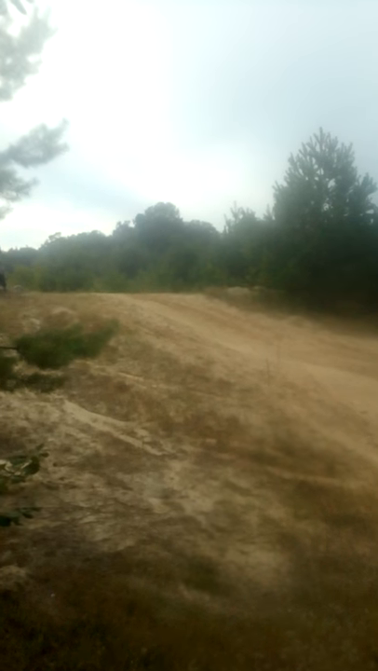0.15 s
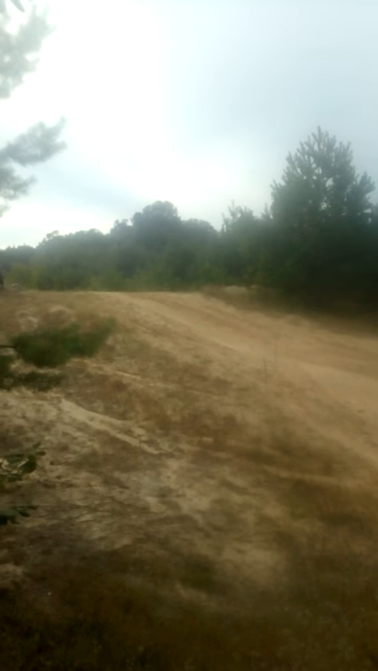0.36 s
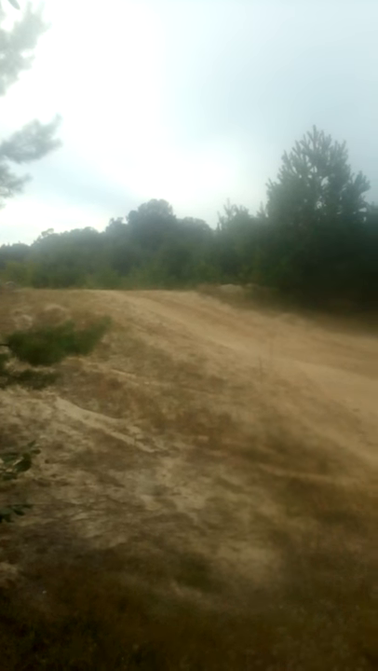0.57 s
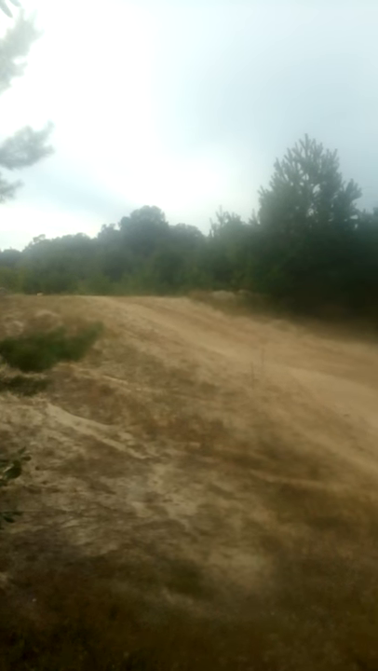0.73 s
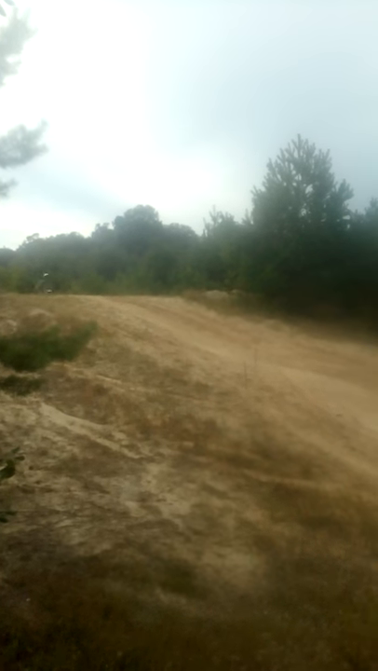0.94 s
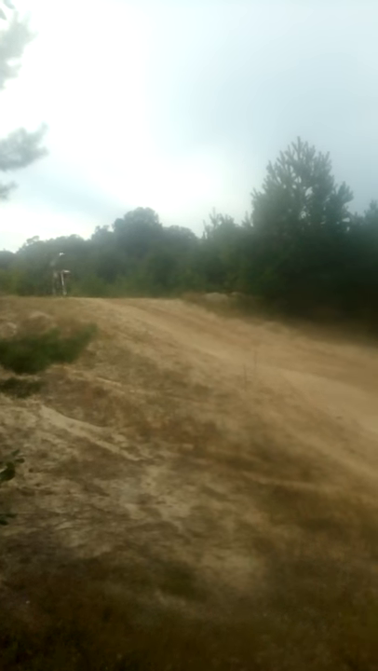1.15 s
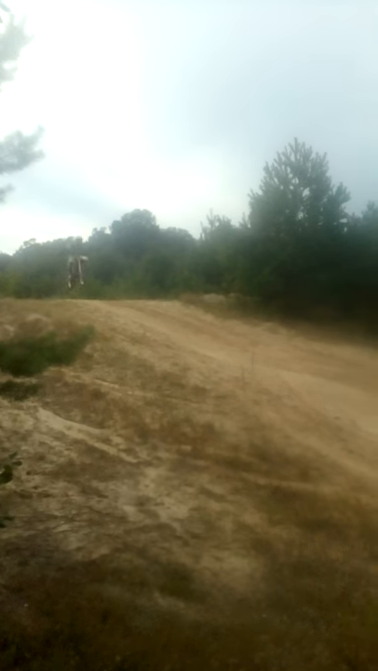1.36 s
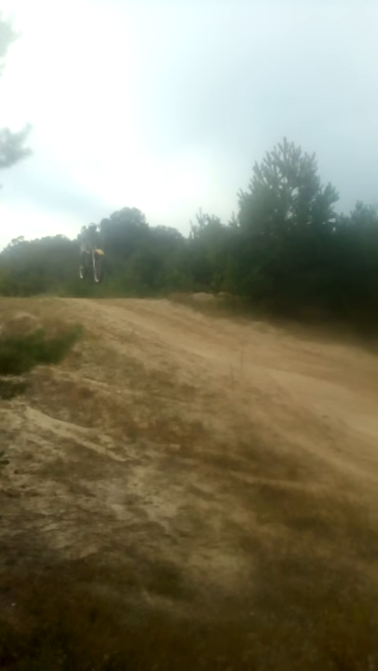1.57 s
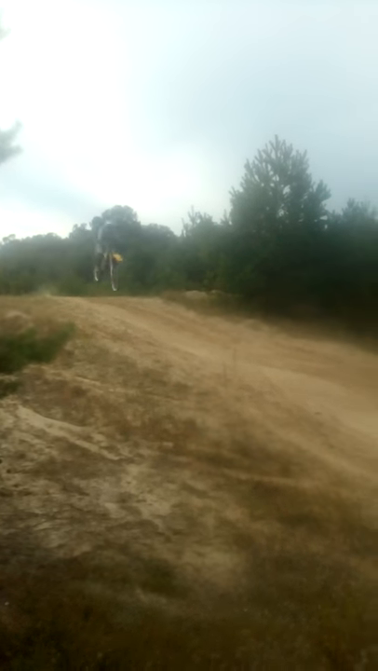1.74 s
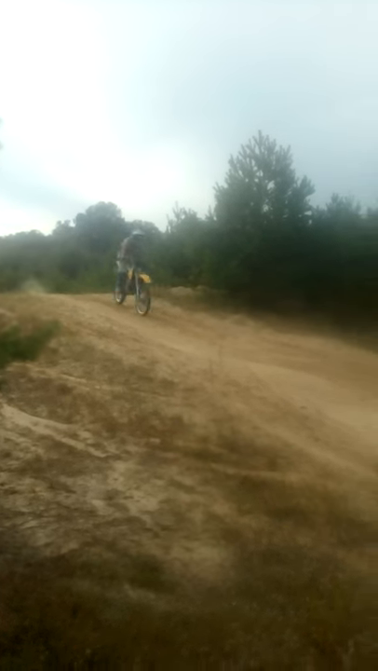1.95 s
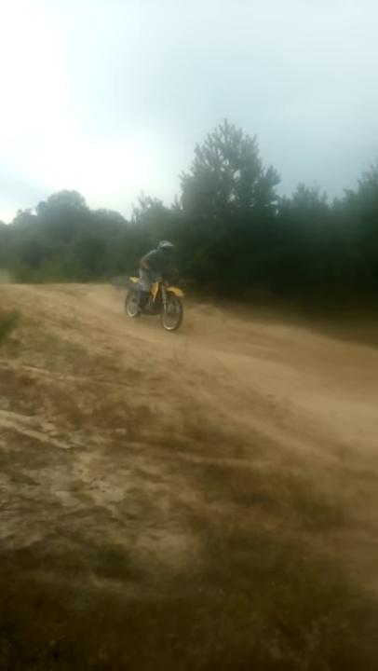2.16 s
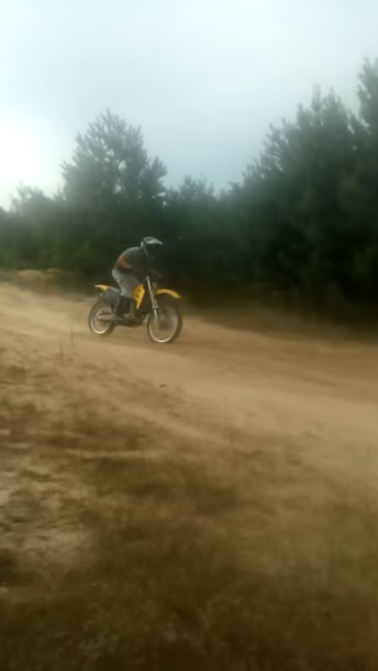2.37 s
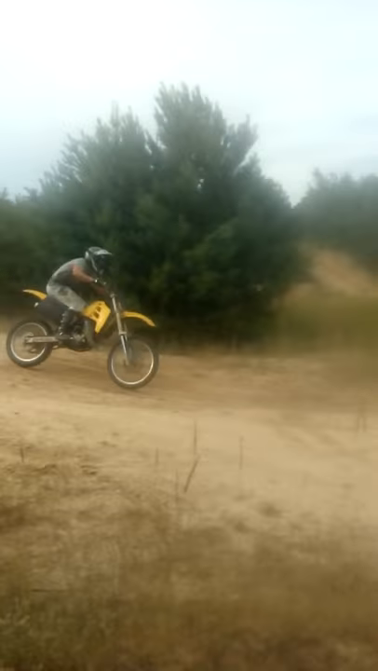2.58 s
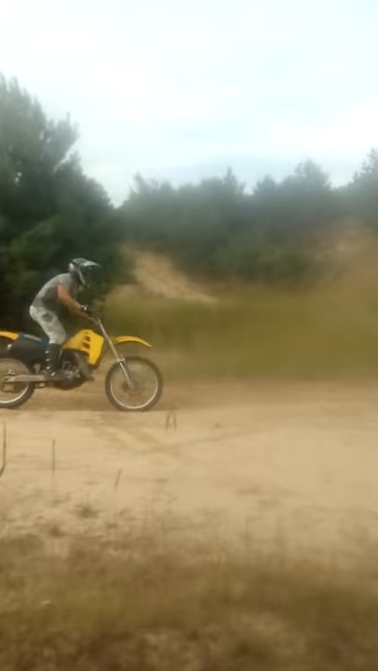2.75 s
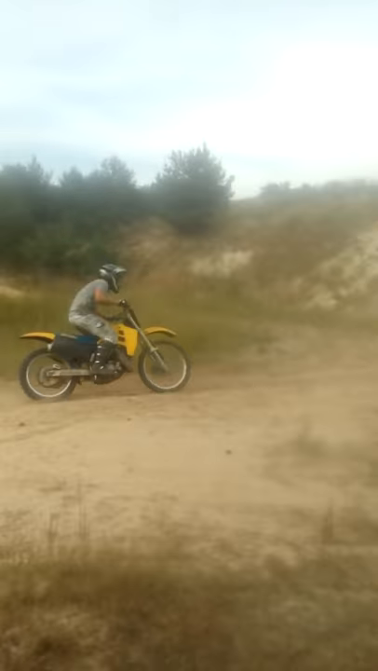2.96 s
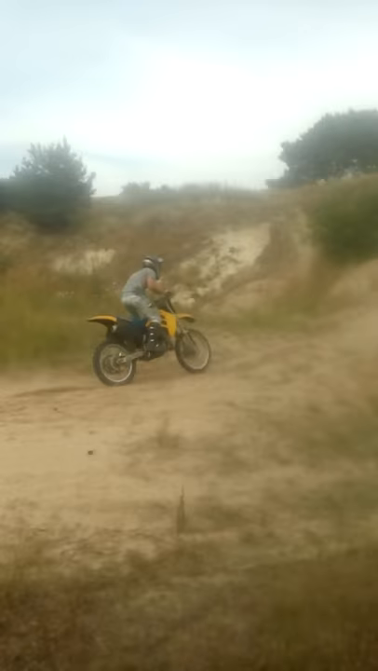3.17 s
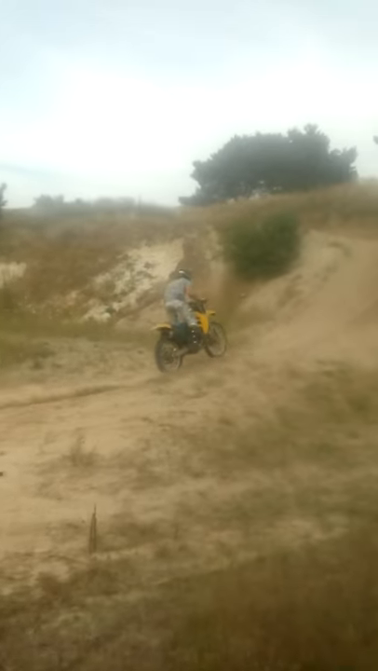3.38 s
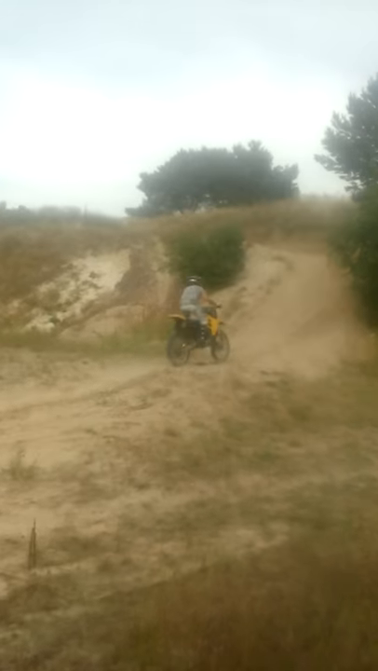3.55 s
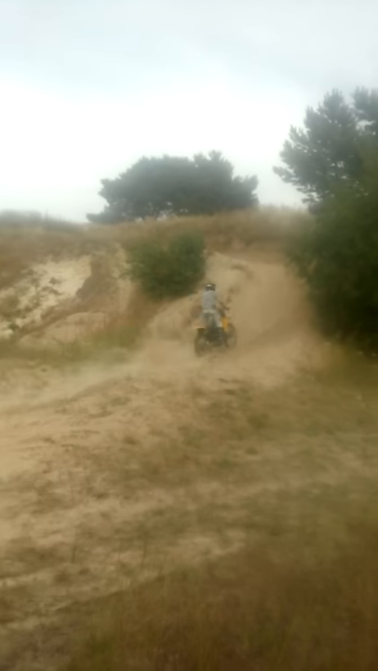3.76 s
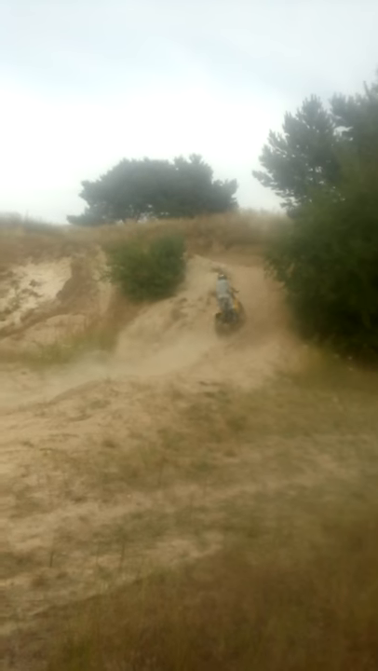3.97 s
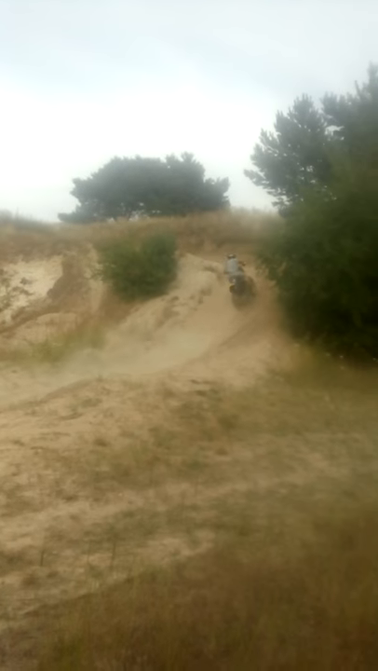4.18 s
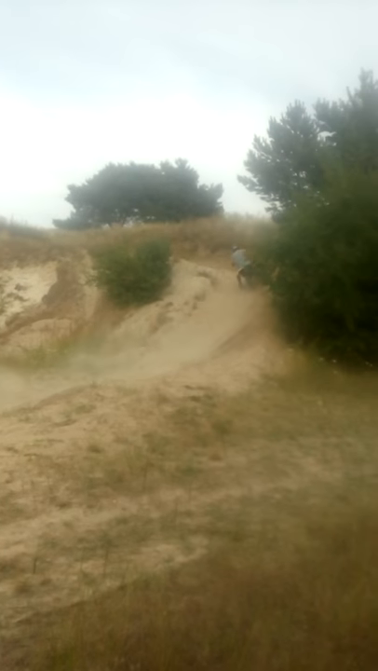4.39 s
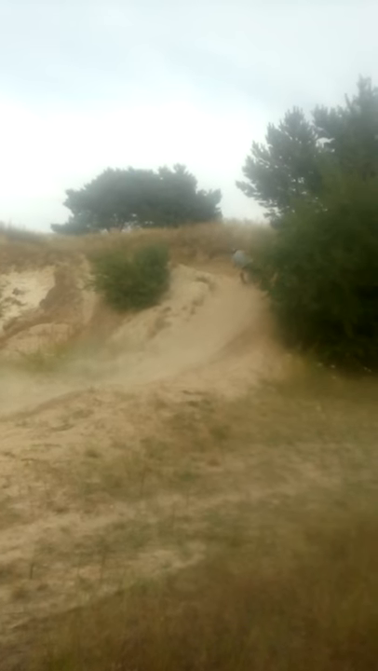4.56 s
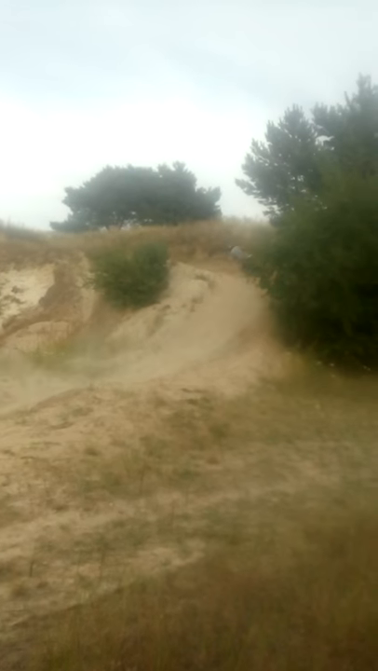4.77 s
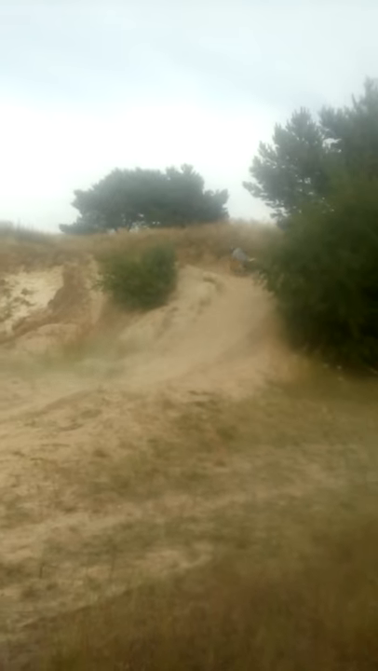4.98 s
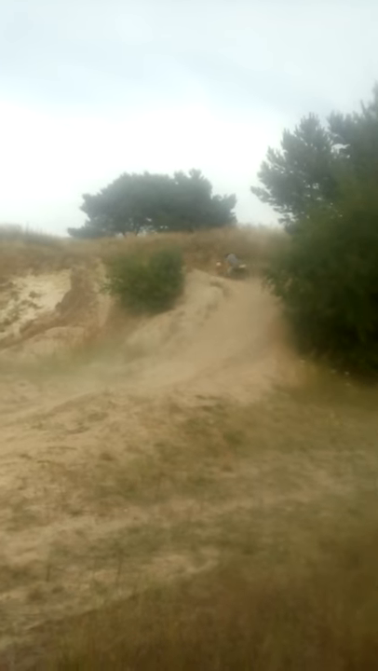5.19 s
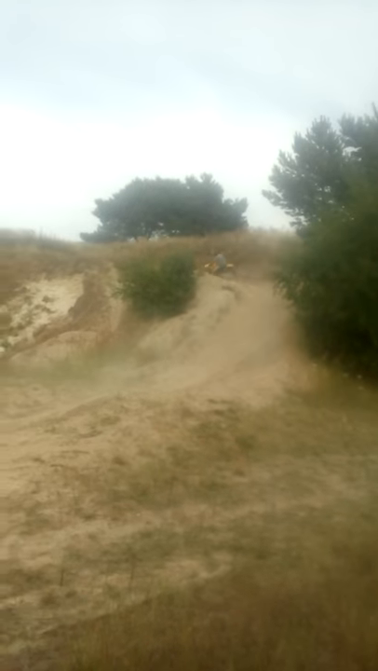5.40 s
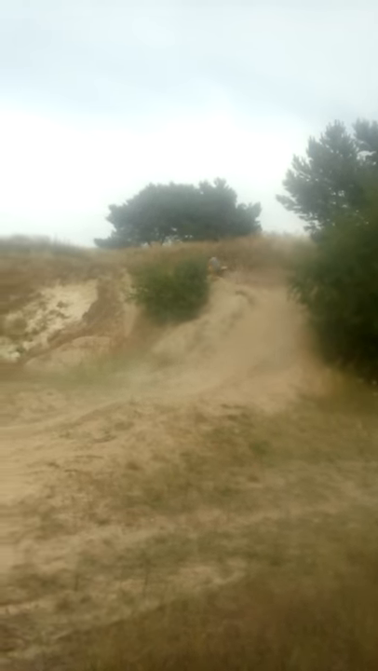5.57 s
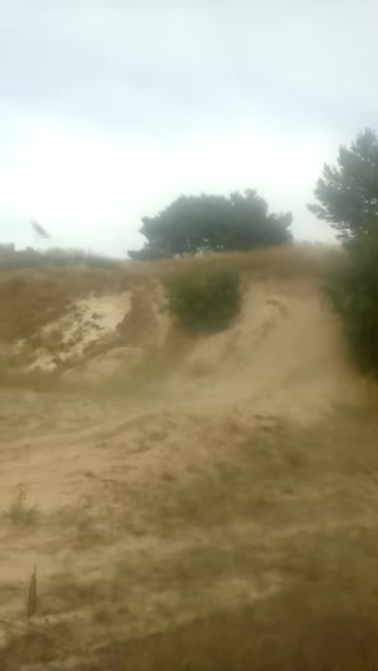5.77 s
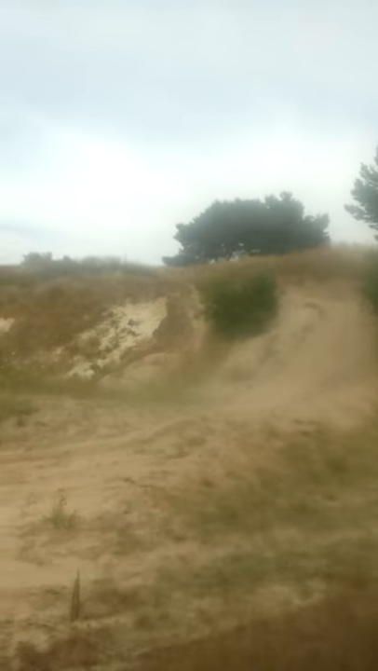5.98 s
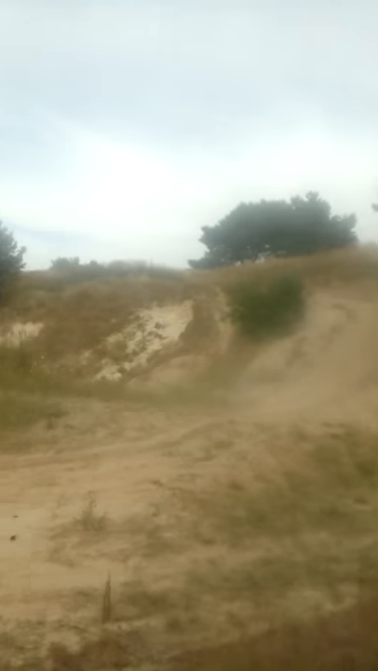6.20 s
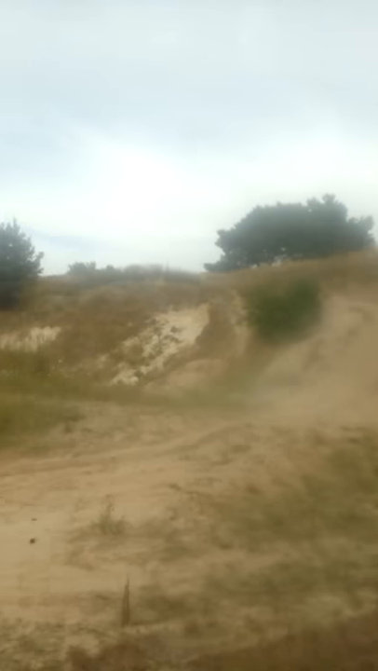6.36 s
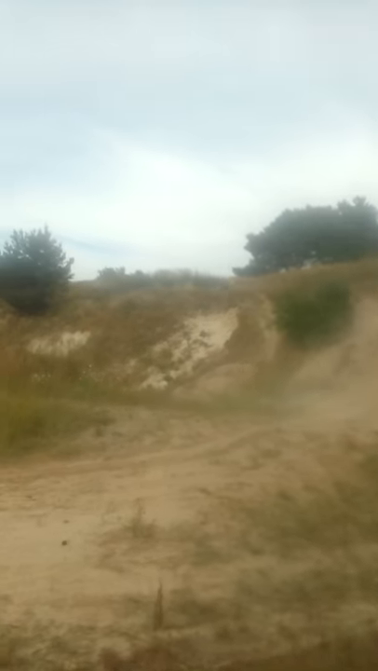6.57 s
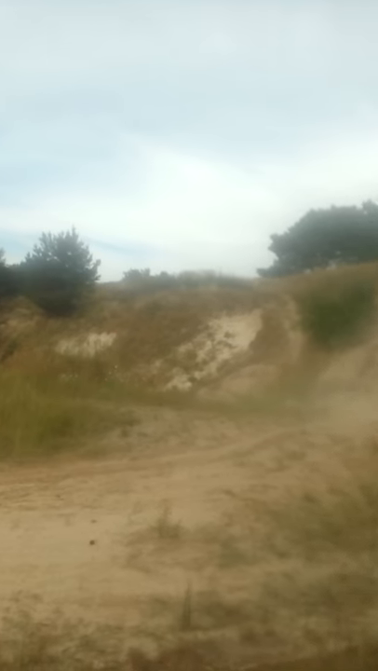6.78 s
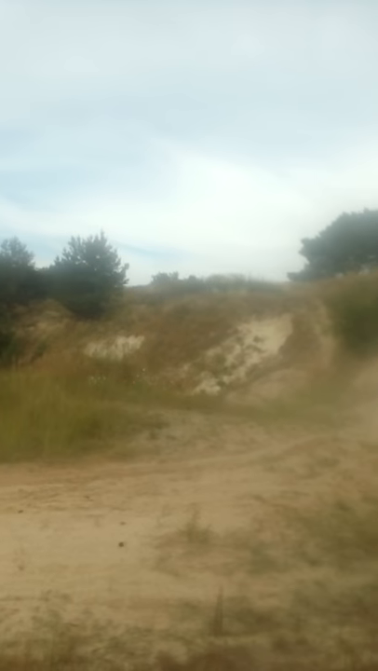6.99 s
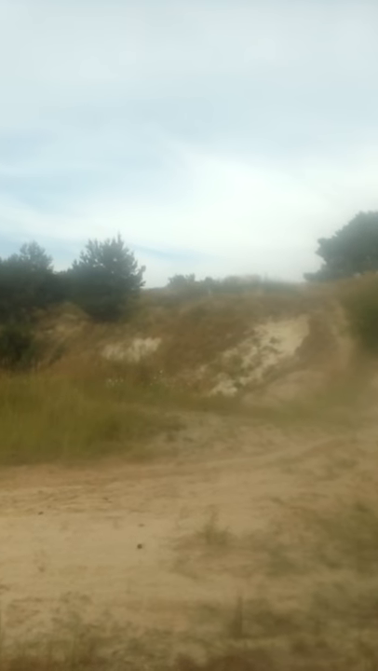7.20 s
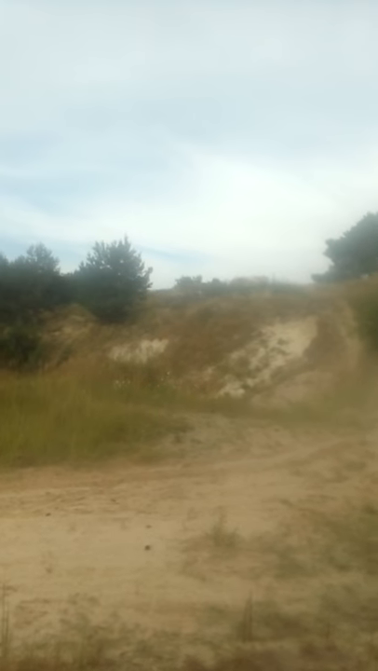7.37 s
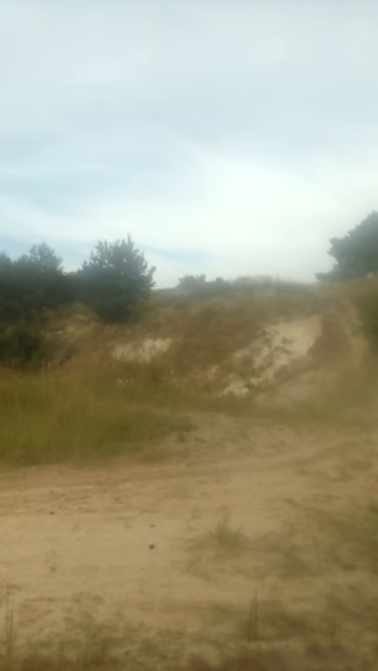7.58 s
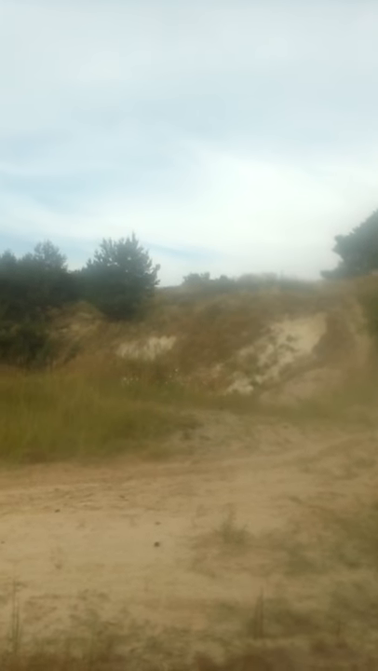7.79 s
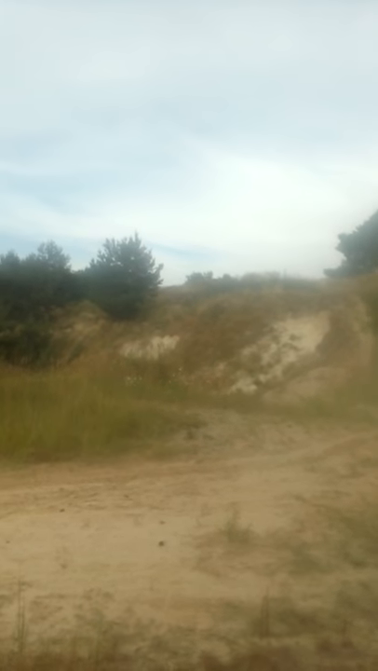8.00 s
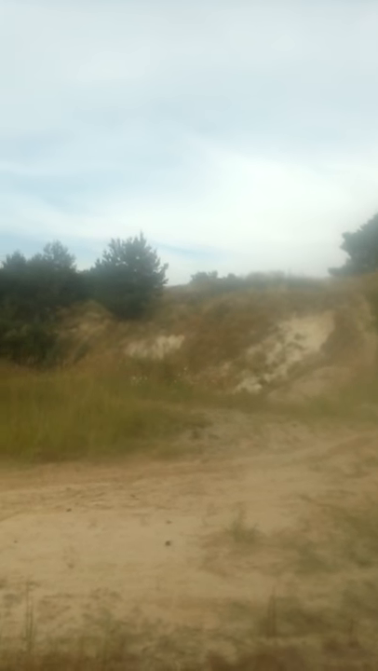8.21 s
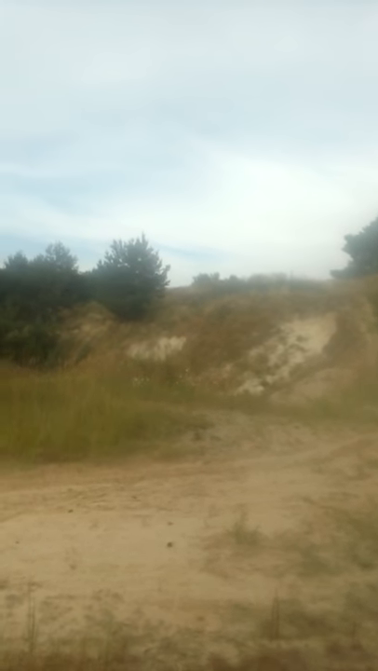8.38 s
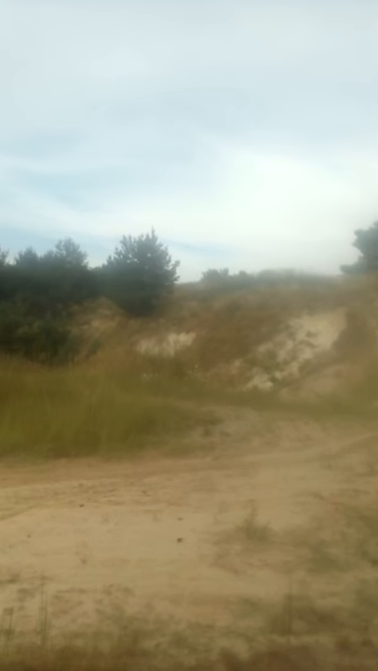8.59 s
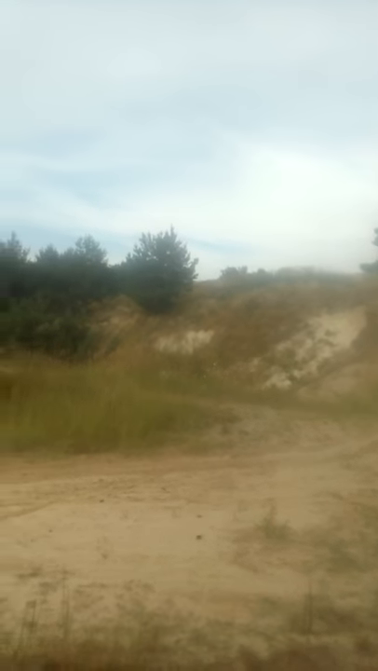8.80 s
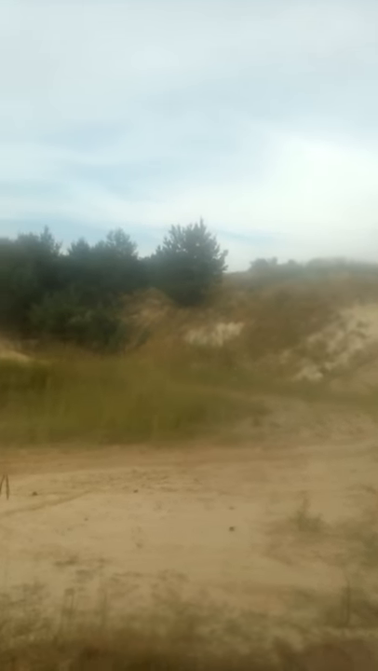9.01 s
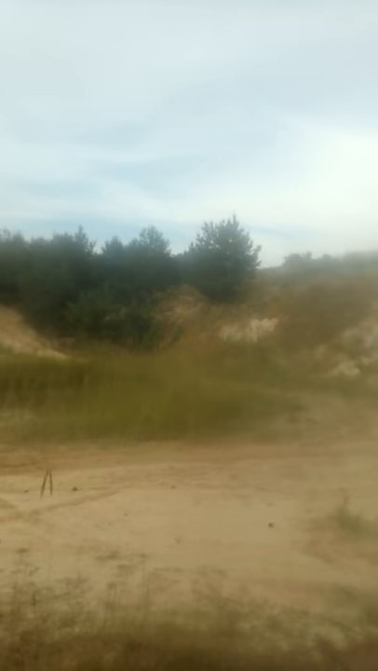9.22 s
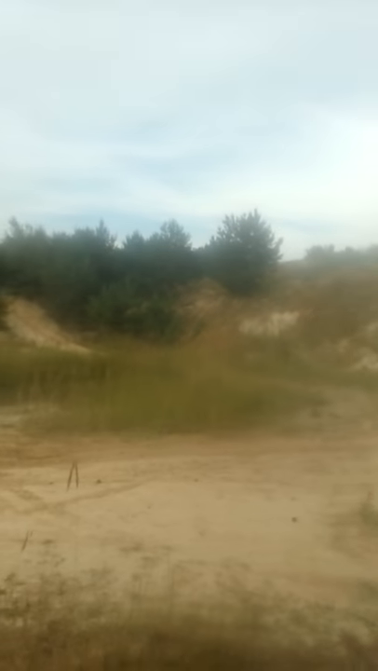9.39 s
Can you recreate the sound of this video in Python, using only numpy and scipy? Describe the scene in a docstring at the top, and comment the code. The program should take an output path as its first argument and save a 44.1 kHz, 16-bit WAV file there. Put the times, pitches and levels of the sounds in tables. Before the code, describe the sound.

Outdoors on open sand, a small two-stroke dirt bike starts distant and muffled, then bursts closer with a hissing, metallic rasp. It passes loudest around three seconds, slightly distorting the microphone, then crackles and revs in bursts up a dune. The engine cuts low behind the crest, with two dull knocks, leaving faint slow puttering, quiet air and small distant blips at the end.

```python
"""Small dirt bike in the sand

A two-stroke bike comes over a sandy rise, passes close, climbs a dune and drops behind it.
It fires once a turn: steady overtones of the firing rate make a boom, a bark and a honk, and each
blast of noise rasps in the silencer and hisses. The throttle snaps open and shut, cracks and dull
knocks are struck resonances, quiet air lies under it all, and the loudest peaks overload the microphone.
"""
import sys
import numpy as np
from scipy import signal
from scipy.fft import rfft, irfft, next_fast_len
from scipy.io import wavfile

SR = 44100
rng = np.random.default_rng(int(sys.argv[2]) if len(sys.argv) > 2 else 0)


def wrap_up_sound(samples):
    """Save the sound to the file named by the first command line argument, as 16-bit audio."""
    columns = np.atleast_2d(samples).T
    # keep every value between -1 and 1, then stretch to whole-number steps
    tamed = np.clip(columns, -1, 1)
    steps = np.round(tamed * 32767).astype(np.int16)
    wavfile.write(sys.argv[1], SR, steps)


N = 416744   # length in samples

# How fast the engine fires, before ruts and wheel slip: t/s, f/Hz
FIRING_RATE = [(0.369, 122.7), (0.49, 164), (0.6, 154), (0.655, 125), (0.71, 108), (0.765, 137),
               (0.84, 126), (1.307, 128.9), (1.377, 147.2), (2.15, 112.5), (2.41, 127), (2.499, 155),
               (2.67, 151), (2.835, 173), (2.913, 140.9), (3.133, 132.3), (3.283, 160.9), (3.457, 153.9),
               (3.577, 135.6), (3.677, 153.9), (3.786, 149.2), (3.826, 128.3), (3.996, 112.3),
               (4.081, 131.8), (4.156, 119.9), (4.245, 126.6), (4.49, 93), (4.844, 148), (5.09, 150),
               (5.28, 131), (5.4, 102), (5.58, 99.5), (5.887, 142.2), (6.161, 127.7), (6.196, 117.9),
               (6.42, 122.4), (6.53, 149), (6.77, 146), (6.79, 104), (7.009, 96.2), (7.493, 95.9),
               (7.802, 81.7), (8.072, 88.1), (8.321, 84.1), (8.47, 90.5), (8.6, 86), (8.64, 75.0),
               (8.98, 72.0), (9.05, 84.0), (9.119, 104.0), (9.354, 77.8), (9.454, 88.8)]
# Ripples in the climb tug at the speed, and the wheel slips and grips in the sand (depths are fractions)
RUTS_S, RUTS_LENGTH_S, RUTS_PER_S, RUTS_DEPTH = 5.08, .6, 8.6, .03
SLIP_DEPTH, SLIP_PER_S = .01, 9

# Throttle eased off, as the bike nears, passes and drops away: t/s, exhaust note level/dB, rasp level/dB
COASTING = [(0, -32, -53.5), (0.63, -39, -59), (1.4, -30, -33), (2.06, -33, -28), (2.29, -30, -26),
            (3.0, -8.5, -16.5), (3.88, -16, -27.5), (4.32, -37.5, -31), (4.46, -32.5, -33),
            (5.45, -18.5, -32.5), (5.74, -22, -29.5), (6.2, -23, -38.5), (6.46, -29, -40.5),
            (6.78, -39.5, -44), (6.9, -55, -57.5), (7.8, -47.5, -52), (9.45, -54, -64.5)]
# Throttle held open: opens t/s, shuts t/s, extra wait of the rasp/s,
# note level/dB, rasp level/dB, note swell by the end/dB, rasp swell by the end/dB
THROTTLE = [(-0.02, 0.5, 0.022, -31, -50.5, 6.5, 6), (0.495, 0.658, .0, -36, -44.5, -0.5, -4),
            (0.636, 1.103, 0.1, -30, -42, -0.5, -6.5), (1.087, 1.352, .0, -27.5, -48.5, 7.5, 19),
            (2.104, 2.235, 0.069, -18.5, -18.5, -7.5, -2), (2.361, 2.884, 0.063, -12, -14, 4, 1.5),
            (3.041, 3.778, 0.021, -6, -12, -3, -6), (3.947, 4.252, 0.057, -8.5, -21, -5, 4),
            (4.253, 4.286, 0, -22, -24.5, 10, 4), (4.47, 5.334, 0.066, -11, -20, -4.5, -2.5),
            (5.766, 6.136, .0, -19.5, -27, 1, -5.5), (6.467, 6.707, 0.00088, -15.5, -35, -5, -2),
            (8.997, 9.193, 0.04, -31, -39.5, -15.5, -6), (9.345, 9.497, 0.038, -40.5, -41, 13, -9)]
NOTE_RISE_S, NOTE_RELEASE_S = 0.043, 0.021
RASP_RISE_S, RASP_RELEASE_S = 0.015, 0.027

# Exhaust tones as the pipe turns: t/s, firing tone level at BOOM_HZ/dB,
# octave level against what is left/dB, level of the overtones near 1 kHz/dB
TONE_BALANCE = [(0, -7.5, -0.5, -9.5), (1.0, -8.5, -1.5, 0.5), (1.75, -9, -0.5, -5), (2.3, -6.5, -2, -7.5),
                (2.85, -11, -0.5, -10), (3.2, -12.5, -1.5, -11.5), (4.3, -6, -1.5, 0), (5.0, -3, 2, -0.5),
                (5.55, -9, -1.5, -1.5), (5.9, -3, -1, 1.5), (6.72, -4.5, -2.5, -3), (6.9, -3.5, -7, 6),
                (8.9, -6, -5, -0.5), (9.05, -3.5, -5, -1.5)]
BOOM_HZ, BOOM_DB_PER_OCTAVE = 125.1, 18.5   # the firing tone carries better the faster the engine turns
HONK_FOLLOWS_NOTE = 0.15   # share of the honk's level that follows the note; the rest follows the rasp
# How the exhaust pipe favours some pitches: f/Hz, level/dB
PIPE = [(260, 18.5), (420, 8.5), (550, 12.5), (680, -5.5), (900, 8), (1200, 0), (1500, -63)]
# Sixth overtone standing out of the pipe's curve: t/s, extra level/dB
SIXTH_OVERTONE = [(2.6, 1.5), (2.76, 11.5), (2.86, 1.5), (8.55, 7), (8.7, 10)]

# Snap of the opening port, sharpest with the pipe towards the listener, and unevenness of the note:
# t/s, snap level over the turbulence/dB (9 dB lower in the freer gas), roughness/0-1
PORT_SNAP = [(3.7, 29, .12), (4.1, 32, .3), (5.3, 30, .1), (6.7, 28, .1), (6.9, 22, .25), (8.95, 22, .3),
             (9.05, 31, .8)]
# Silencer resonances, before their slow swelling: f/Hz, width/Hz, level/dB
SILENCER = [(1963, 370, 5.5), (2356, 215, 3), (2716, 173, -2.5)]
# Thin ring of the silencer shell, gliding as the bike passes and turns away: t/s, f/Hz
SHELL_RING = [(3.05, 2163), (3.25, 2060), (3.5, 2153), (3.65, 2106), (3.75, 1918), (4.8, 2073)]
SHELL_WIDTH_HZ, SHELL_DB = 103, 7

# Treble that reaches the listener: t/s, hiss level over the rasp/dB,
# sizzle level over the hiss/dB (before a steady 15.5 dB cut)
OPENNESS = [(0, -4.5, -2), (1.1, -8, -1), (1.35, -3.5, 6), (2.0, -11, 5.5), (3.3, -4.5, -1),
            (4.7, -9.5, -7), (5.7, 0, -26), (6.7, -1.5, -26), (7.1, -1.5, -20)]
# Colour of the gas hiss: f/Hz, relative level/dB
HISS = [(2500, -6.5), (3300, -15.5), (4400, -17.5), (5200, -15), (6300, -11.5), (7600, -31.5),
        (12000, -63.5)]
# Colour of the sizzle at the very top: f/Hz, relative level/dB
SIZZLE = [(8500, 5.5), (15500, -32.5)]
# Metal ringing in the treble, heard from the front: f/Hz, width/Hz, relative level/dB
RING_FRONT = [(4670, 640, -7), (5515, 730, 0), (6420, 180, 4.5)]
TURNS_S, TURN_LENGTH_S, FRONT_DB = 2.4, .4, -6.0   # the bike swings side-on and the ringing fades

# Colour of the quiet outdoor air: f/Hz, relative level/dB
AIR = [(30, -45.5), (170, 0), (550, -18), (1000, -2.5), (1500, -22), (2000, -0.5), (3300, -29), (5600, -32),
       (8000, -77)]
AIR_DB = -52.5   # level around which the air drifts

# Missed firings: t/s
MISFIRES = [0.641, 4.06, 4.089, 4.139, 4.184, 9.034]
MISFIRE_S, MISFIRE_NOTE_DB, MISFIRE_RASP_DB = 0.019, -5.5, -4
# Spells when every second firing is weak: t/s, length/s, depth/0-1
STUMBLES = [(2.233, 0.37, 0.44), (3.072, 0.065, 0.74), (3.709, 0.047, 0.6)]
# Hard firings that crack in the silencer: t/s, blow level before each resonance's own gain/dB
CRACKS = [(2.1944, -1), (4.0192, -2.5), (4.0269, 1), (4.0355, 6.5), (4.044, 3), (4.0743, 4.5),
          (4.1048, -10), (4.283, 3), (9.0204, -25), (9.046, -33), (9.081, -22), (9.111, -20), (9.395, -37)]
# Dull knocks from behind the dune: t/s, f/Hz, peak level/dB, time to fade by 60 dB/s
KNOCKS = [(6.8138, 523, -27, 0.031), (6.845, 150, -26, 0.14)]

CUTOFF_HZ = 16000   # the recorder's filter is 70 dB down from here up


def from_db(db):
    """Turn a level in dB into a gain."""
    return 10 ** (np.asarray(db) / 20)


def rms_one(x):
    """Scale a signal to an average (rms) strength of 1."""
    return x / np.sqrt(np.mean(x ** 2) + 1e-20)


def in_time(rows):
    """Draw straight lines between a table's rows: one curve per column after the time."""
    s, *columns = np.transpose(rows)
    return [np.interp(np.arange(N) / SR, s, c) for c in columns]


def at_hz(points, hz):
    """Read a spectrum's level at a pitch, along a log-frequency axis."""
    table_hz, table_db = np.array(points)[:, 0], np.array(points)[:, 1]
    return np.interp(np.log(hz), np.log(table_hz), table_db)


def drift(rate):
    """Slow random wandering of spread 1: noise smoothed twice below about `rate` Hz."""
    r = np.exp(-80 * np.pi * rate / SR)
    noise = rng.standard_normal(N // 40 + 2002)   # one point per 40 samples, plus a run-in
    slow = signal.lfilter([1], [1, -2 * r, r * r], noise)[2000:]
    return np.interp(np.arange(N) / 40, np.arange(len(slow)), rms_one(slow))


def coloured(x, spectrum):
    """Shape a signal by a spectrum, then scale it to rms 1."""
    size = next_fast_len(N, True)
    hz = np.maximum(np.fft.rfftfreq(size, 1 / SR), 1)
    shaped = rfft(x, size) * from_db(at_hz(spectrum, hz))
    return rms_one(irfft(shaped, size)[:N])


def resonance(x, hz, width_hz):
    """Strengthen one pitch with a two-pole resonance whose peak gain is 1."""
    r = np.exp(-np.pi * width_hz / SR)
    poles = [1, -2 * r * np.cos(2 * np.pi * hz / SR), r * r]
    return signal.lfilter([(1 - r * r) / 2, 0, (r * r - 1) / 2], poles, x)


def narrow(x, hz, width_hz):
    """Pass through the same resonance twice, for steep skirts."""
    return resonance(resonance(x, hz, width_hz), hz, width_hz)


def gliding(x, hz, width_hz):
    """A narrow resonance whose centre moves: shift down, low-pass twice, shift back."""
    turn = np.exp(2j * np.pi * np.cumsum(hz) / SR)
    r = np.exp(-np.pi * width_hz / SR)
    smoothed = signal.lfilter([(1 - r) ** 2], [1, -2 * r, r * r], x / turn)
    return 2 * (turn * smoothed).real


def ring(blows, hz, t60):
    """Strike one resonance with blows (t/s, level/dB); each dies away by 60 dB in t60 seconds."""
    clicks = np.full(N, 1e-18)   # a trace of input keeps the filter from vanishingly small numbers
    r, w = from_db(-60 / (t60 * SR)), 2 * np.pi * hz / SR
    for s, db in blows:
        clicks[round(s * SR)] = from_db(db)
    return signal.lfilter([0, np.sin(w)], [1, -2 * r * np.cos(w), r * r], clicks)


def engine_speed():
    """Firings per second, shaken by ruts and wheel slip."""
    since = np.arange(N) / SR - RUTS_S
    ruts = RUTS_DEPTH * np.exp(-(2 * since / RUTS_LENGTH_S) ** 2) * np.cos(2 * np.pi * RUTS_PER_S * since)
    return in_time(FIRING_RATE)[0] * (1 + ruts + SLIP_DEPTH * drift(SLIP_PER_S))


def throttled(coast_db, column, rise_s, release_s, lags):
    """A level that rises from coasting to each burst's own, swells through it and falls back."""
    t, level = np.arange(N) / SR, coast_db
    for opens, shuts, lag_s, *columns in THROTTLE:
        start_db, swell_db = columns[column::2]   # column 0 is the note, 1 the rasp
        rise = 1 - np.exp(-np.maximum(t - opens - lags * lag_s, 0) / rise_s)
        held = rise * np.clip(1 + (shuts - t) / release_s, 0, 1)
        burst_db = start_db + swell_db * np.clip((t - opens) / (shuts - opens), 0, 1)
        level = np.maximum(level, coast_db + held * (burst_db - coast_db))
    return level


def exhaust_tones(turns, per_s, load_db, rasp_db, rough, split_hz=588.0):
    """Overtones of the firing rate through the pipe; echoes off the sand make each one waver."""
    boom_db, octave_db, honk_db = in_time(TONE_BALANCE)
    honk_db = honk_db + rasp_db + HONK_FOLLOWS_NOTE * (load_db - rasp_db)
    first = from_db(boom_db + BOOM_DB_PER_OCTAVE * np.log2(per_s / BOOM_HZ))
    second = from_db(octave_db) * np.sqrt(np.clip(1 - first ** 2, .08, 1))
    thin = 1 - np.clip(first + second, 0, 1)   # a weak bass goes with brighter overtones
    rest = np.sqrt(np.clip(1 - first ** 2 - second ** 2, .08, 1))   # what is left barks in the next overtones
    sixth_db, = in_time(SIXTH_OVERTONE)
    bark, honk, bark_power, honk_power = np.zeros((4, N))
    for k in range(3, 16):
        hz = k * per_s
        high = np.clip((hz / split_hz - 1) * 4.0 + .5, 0, 1)   # 0 belongs to the bark, 1 to the honk
        odd_db = -1.5 * (k % 2)   # the reflected pulse half a turn later weakens odd overtones
        bright_db = 18 * thin * (1 - high) * np.log2(hz / 400)
        waver_db = (1.5 if k == 6 else 3.2) * (1 + 2 * rough) * drift(5.0)
        size = from_db(at_hz(PIPE, hz) + odd_db + bright_db + waver_db)
        wobble = .07 * (1 + 4 * rough ** 2) * drift(9.0)   # in cycles
        wave = np.cos(2 * np.pi * (k * turns + .012 * k * k + wobble))
        tone = from_db(sixth_db * (k == 6)) * size * wave
        bark += (1 - high) * tone
        honk += high * tone
        bark_power += ((1 - high) * size) ** 2 / 2
        honk_power += (high * size) ** 2 / 2
    boom = np.sqrt(2) * np.cos(2 * np.pi * turns)
    octave = np.sqrt(2) * np.cos(2 * np.pi * (2 * turns + 0.21))
    note = first * boom + stumble(turns) * (second * octave + rest * bark / np.sqrt(bark_power))
    scream = stumble(turns) * honk / np.sqrt(honk_power)
    uneven = from_db(3.07 * rough * drift(47.0))
    # minus sign: each firing arrives as a suction dip
    return -uneven * (from_db(load_db) * note + from_db(honk_db) * scream)


def blasts(turns, snap_db, fade=1.5):
    """A snap as the port opens, then turbulence that fades through the turn; strengths vary at random."""
    cycle = turns.astype(int)
    strength = from_db(1.7 * rng.standard_normal(2000))[cycle]
    snap = from_db(snap_db) * np.diff(cycle, prepend=0)
    puff = (0.45 + np.exp(-fade * (turns - cycle))) * rng.standard_normal(N)
    return strength * (snap + puff)


def silencer(x):
    """Shell and baffle resonances side by side; the baffle resonances swell and sink slowly at random."""
    swell_db = [2.0 * drift(1.5) for _ in SILENCER]
    mix = from_db(SHELL_DB) * gliding(x, in_time(SHELL_RING)[0], SHELL_WIDTH_HZ)
    for k, (hz, width_hz, db) in enumerate(SILENCER):
        mix = mix + (-1) ** k * from_db(db + swell_db[k]) * narrow(x, hz, width_hz)
    return mix


def sand_echo(x):
    """A reflection off the ground whose lag of about 3 ms wanders slowly at random."""
    at = np.arange(N)
    return x + .35 * np.interp(at - SR * (.003 + .0005 * drift(.8)), at, x)


def gas_hiss(gas, rasp_db):
    """Treble of the rushing gas: hiss, ringing metal heard from the front, and a sizzle on top."""
    hiss_db, sizzle_db = in_time(OPENNESS)
    side_on = np.clip((np.arange(N) / SR - TURNS_S) / TURN_LENGTH_S, 0, 1)
    front = rms_one(sum(from_db(db) * narrow(gas, hz, w) for hz, w, db in RING_FRONT))
    metal = from_db(FRONT_DB) * (1 - side_on) * front
    sizzle = from_db(sizzle_db - 15.5) * coloured(gas, SIZZLE)
    return from_db(rasp_db + hiss_db) * (coloured(gas, HISS) + metal + sizzle)


def gas_roar(gas, load_db):
    """Turbulent gas coloured by the pipe, following the note's level."""
    return from_db(load_db - 19) * coloured(gas, [(90, -45)] + PIPE)


def low_flutter(load_db):
    """Deep noise below the firing tone, following the note's level."""
    return from_db(load_db - 31.5) * coloured(rng.standard_normal(N), [(26, 27.0), (45, -61)])


def still_air():
    """Quiet coloured noise whose level drifts slowly."""
    return from_db(AIR_DB + drift(0.44)) * coloured(rng.standard_normal(N), AIR)


def misfiring():
    """A smooth bump for each missed firing: 1 in its middle, near 0 elsewhere."""
    t = np.arange(N) / SR
    return sum(np.exp(-(2 * (t - s) / MISFIRE_S) ** 2) for s in MISFIRES)


def stumble(turns):
    """Gain that is high on one turn and low on the next while the mixture stumbles."""
    t = np.arange(N) / SR
    depth = sum(d * np.exp(-(2 * (t - s) / length) ** 2) for s, length, d in STUMBLES)
    return 1 + depth * np.cos(np.pi * turns)


def silencer_cracks():
    """Hard firings strike three quickly fading silencer resonances."""
    return 0.3 * ring(CRACKS, 1984, 0.046) + 0.19 * ring(CRACKS, 1140, 0.027) + 0.072 * ring(CRACKS, 4800, 0.0052)


def dune_knocks():
    """Each dull knock strikes one resonance of its own."""
    return sum(ring([(s, db)], hz, t60) for s, hz, db, t60 in KNOCKS)


def bike():
    """One count of engine turns drives the tones and gas blasts; flutter and cracks are added."""
    per_s = engine_speed()
    turns = np.cumsum(per_s) / SR
    coast_note_db, coast_rasp_db = in_time(COASTING)
    missed = misfiring()
    load_db = throttled(coast_note_db, 0, NOTE_RISE_S, NOTE_RELEASE_S, lags=False) + MISFIRE_NOTE_DB * missed
    rasp_db = throttled(coast_rasp_db, 1, RASP_RISE_S, RASP_RELEASE_S, lags=True) + MISFIRE_RASP_DB * missed
    snap_db, rough = in_time(PORT_SNAP)
    sharp = blasts(turns + .22, snap_db)
    gas = blasts(turns + .1, snap_db - 9)
    tones = exhaust_tones(turns, per_s, load_db, rasp_db, rough)
    rasp = from_db(rasp_db) * rms_one(sand_echo(silencer(sharp) + 0.41 * resonance(gas, 1260, 230)))
    breath = gas_hiss(gas, rasp_db) + gas_roar(gas, load_db)
    return tones + rasp + breath + low_flutter(load_db) + silencer_cracks()


def scene():
    """The bike, the still air and the far knocks, in one channel."""
    return (bike() + still_air() + dune_knocks())[None]


def record(dry):
    """The microphone flattens the loudest peaks, then a steep filter cuts the top."""
    clipped = np.clip(dry, -.96, .96)
    top_cut = signal.cheby2(20, 70, CUTOFF_HZ, fs=SR, output="sos")
    return np.clip(signal.sosfilt(top_cut, clipped), -1, 1)


dry = scene()
out = record(dry)
wrap_up_sound(out)
```